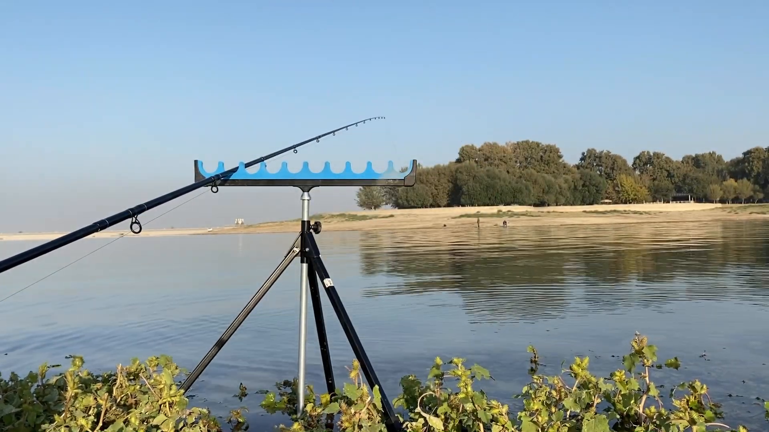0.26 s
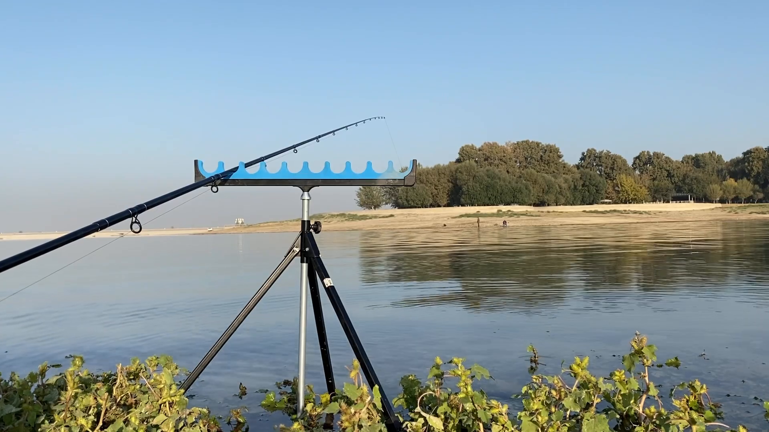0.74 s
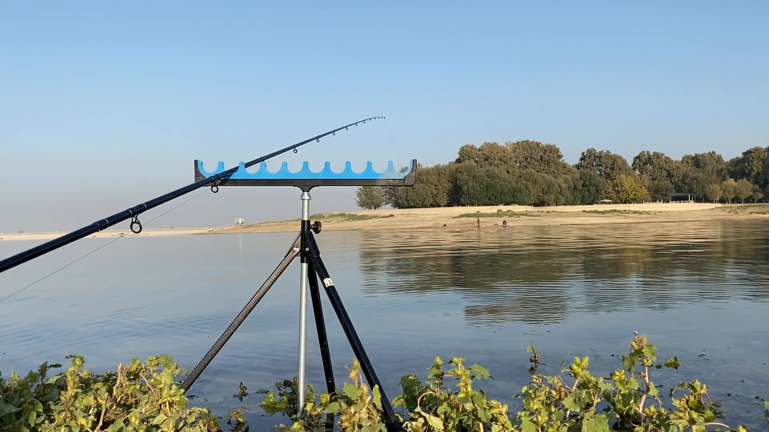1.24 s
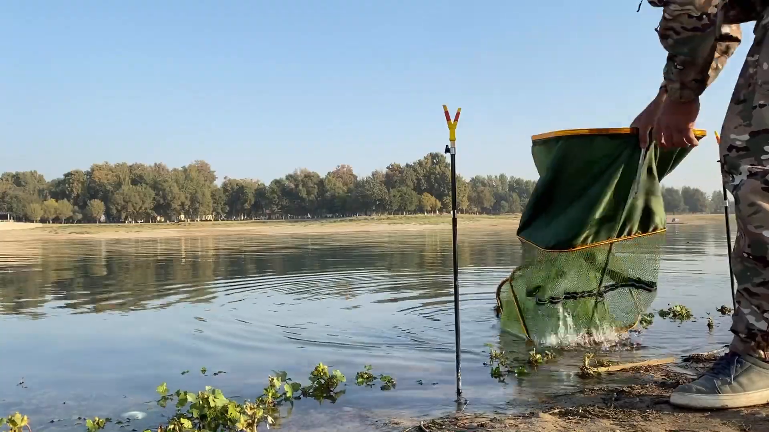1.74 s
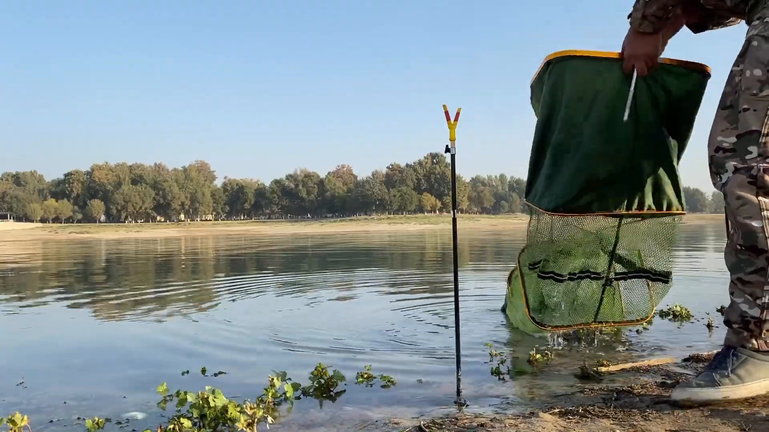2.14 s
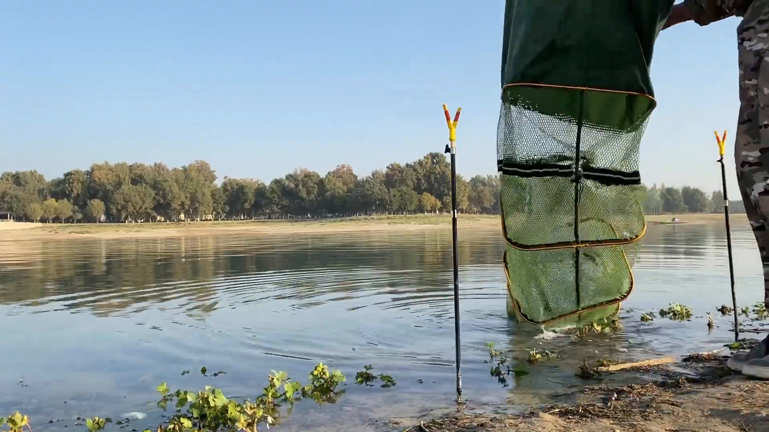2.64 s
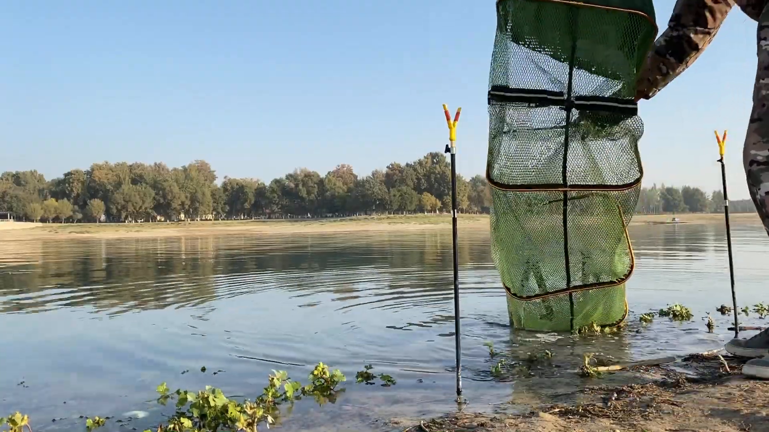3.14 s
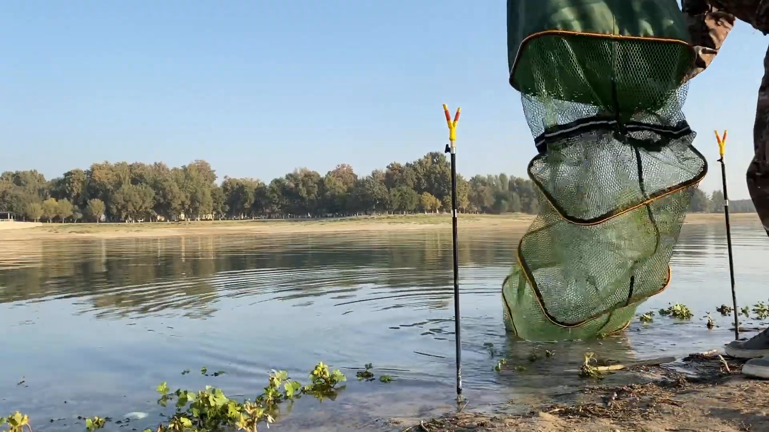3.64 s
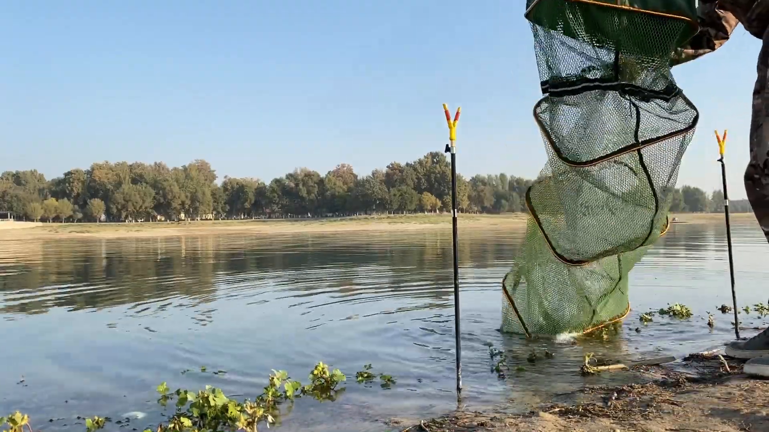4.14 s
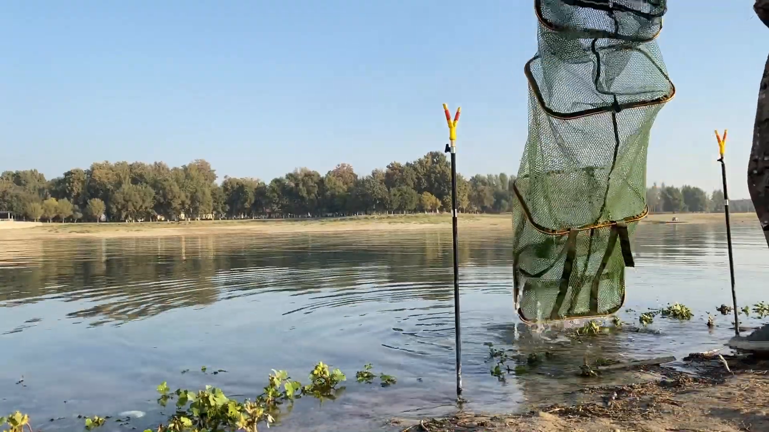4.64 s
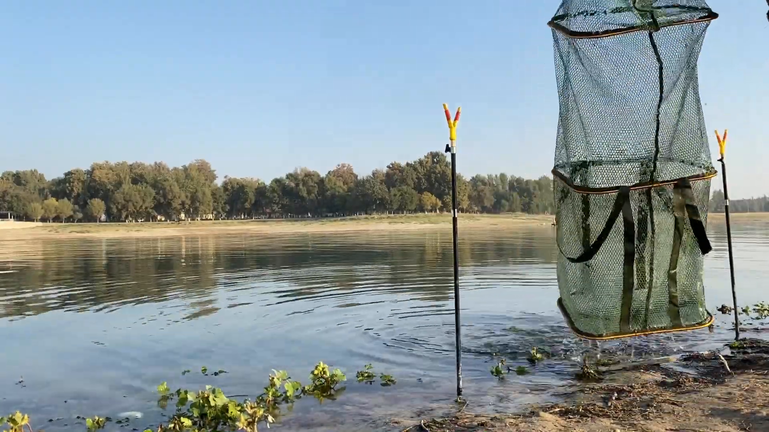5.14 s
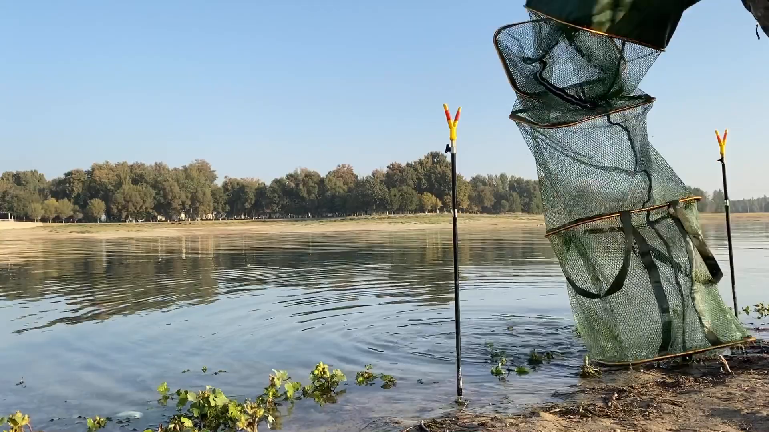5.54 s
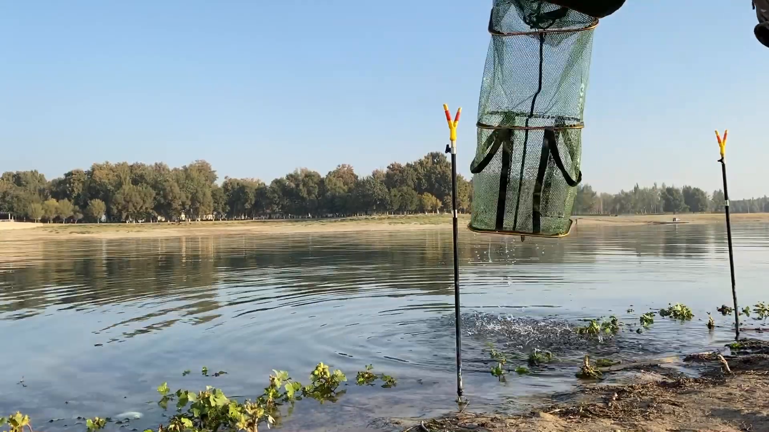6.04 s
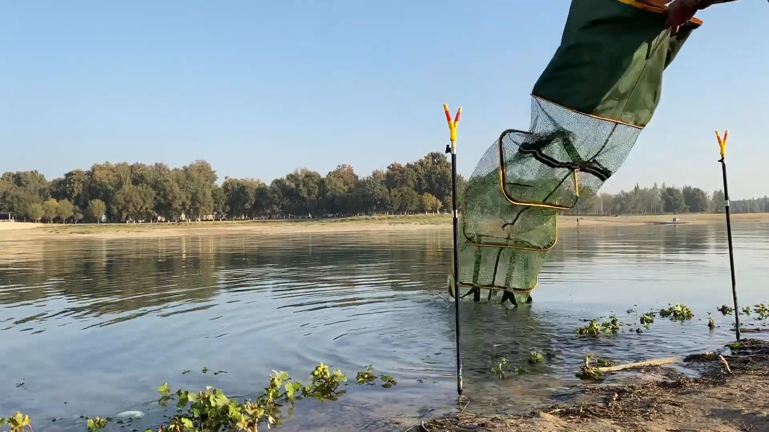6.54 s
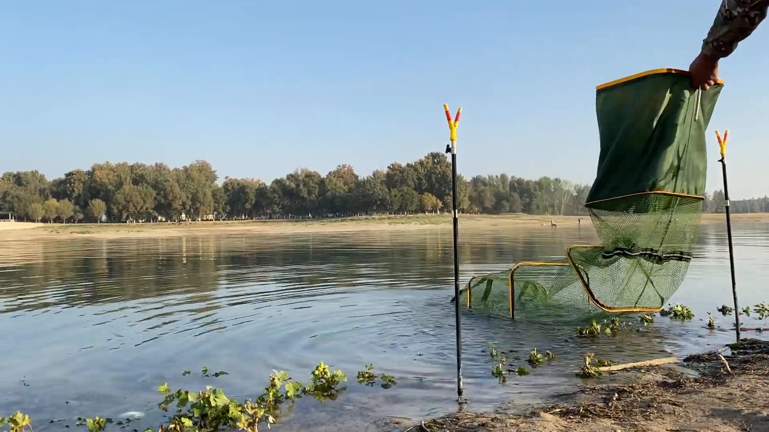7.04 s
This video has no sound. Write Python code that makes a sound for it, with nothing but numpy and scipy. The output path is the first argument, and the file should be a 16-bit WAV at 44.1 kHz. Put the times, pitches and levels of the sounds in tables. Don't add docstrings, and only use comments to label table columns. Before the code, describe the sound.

Low distant hum by calm water, tiny ratchet clicks, an abrupt change, then a wet net pouring, dripping, and dropping back into the shallows.

```python
import sys
import numpy as np
from scipy import signal
from scipy.fft import rfft, irfft, next_fast_len
from scipy.io import wavfile
from scipy.ndimage import uniform_filter1d

SR = 44100
rng = np.random.default_rng(int(sys.argv[2]) if len(sys.argv) > 2 else 0)


def transcribe(u):
    v = np.clip(np.atleast_2d(u).T, -1, 1)
    q = np.round(v * 32767).astype(np.int16)
    wavfile.write(sys.argv[1], SR, q)


def to_linear_factor(level_db):
    exponent = np.asarray(level_db, float) / 20
    return 10 ** exponent


N = 321577


def evened(x):
    return x / np.sqrt(np.mean(x ** 2) + 1e-20)


def read(points, hz):
    f, value = np.transpose(points)
    return np.interp(np.log(hz + 1), np.log(f + 1), value)


def add(mix, s, sound):
    part = mix[round(s * SR):][:len(sound)]
    part += sound[:len(part)]


def coloured(x, points):
    size = next_fast_len(x.shape[-1])
    gain = to_linear_factor(read(points, np.fft.rfftfreq(size, 1 / SR)))
    return irfft(rfft(x, size) * gain, size)[..., :x.shape[-1]]


def band(x, hz, width_hz):
    q = max(hz / width_hz, 0.4)
    return signal.lfilter(*signal.iirpeak(np.clip(hz, 50, 16000), q, SR), x)


def band_twice(x, hz, width_hz):
    return band(band(x, hz, width_hz), hz, width_hz)


def decay(count, t60_s):
    return to_linear_factor(-60 * np.arange(count) / SR / t60_s)


def tick(puff, hz, width_hz, t60_s):
    burst = band_twice(puff * decay(len(puff), t60_s), hz, width_hz)
    return burst / abs(burst).max()


def drops(per_s, spread_db):
    size = to_linear_factor(spread_db * np.minimum(rng.exponential(1, N), 3.4))
    return size * rng.choice([-1., 1.], N) * (rng.random(N) < per_s / SR)


def bubble(hz, t60_s, rise):
    t = np.arange(round(t60_s * SR) + 64) / SR
    ring = np.sin(2 * np.pi * hz * (t + rise * t ** 2 / t60_s))
    return to_linear_factor(-60 * t / t60_s) * (1 - np.exp(-t * hz)) * ring


RISE_SHARE = 0.77


def surges(rows, stretch=1, rise=RISE_SHARE):
    t = np.arange(0, N + 64, 64) / SR
    s, db, fall_s = np.transpose(rows)[:, :, None]
    past = (t - s) / fall_s
    power = to_linear_factor(db - 10 * np.maximum(past / stretch, -past / rise)) ** 2
    return np.interp(np.arange(N) / SR, t, np.sqrt(power.sum(0)))


# [f/Hz, phase/rad]
PORT_PHASE = [(0, -.3), (2070, -.3), (3450, .2), (4800, -.1), (6200, -1.5), (6900, -1.3), (8270, -3.2),
              (11000, -6.4), (11700, -6.9), (13100, -9.1), (14500, -10.3), (15200, -12), (15900, -12.5)]
# [f/Hz, likeness/1]
NEAR_SAME = [(300, 0.98), (1000, 0.89), (2500, 0.9), (4500, 0.33), (8000, 0.78), (13000, 0.87)]


def ports(x, lean, same):
    size = next_fast_len(N)
    hz = np.fft.rfftfreq(size, 1 / SR)
    scatter = rng.standard_normal(1500) * to_linear_factor(-60 * np.arange(1500) / 1500)
    like, mid = np.clip(read(same, hz), 0, 1), rfft(x, size)
    direct = mid * np.sqrt((1 + like) / 2)
    echo = mid * np.sqrt((1 - like) / 2) * rfft(scatter / np.linalg.norm(scatter), size)
    turn = np.interp(hz, *np.transpose(PORT_PHASE)) * hz ** 2 / (hz ** 2 + 300 ** 2)
    offset = to_linear_factor(read(lean, hz) / 2) * np.exp(.5j * turn)
    return irfft([(direct + echo) * offset, (direct - echo) / offset], size)[:, :N]


# [f/Hz, density/dB per Hz]
AIR_1 = [(15, -76), (25, -65.5), (57, -10), (81, -3.5), (176, -29.5), (246, -28), (404, -33), (510, -31),
         (815, -36.5), (1480, -50), (1730, -53), (10400, -73.5), (12500, -90), (16200, -116), (22000, -120)]
# [f/Hz, likeness/1]
SAME_1 = [(60, 0.93), (130, 0.92), (290, 0.36), (640, -0.42), (1410, -0.73), (3100, 0.0083), (6820, -0.28),
          (15000, 1)]
# [f/Hz, level/dB]
LEAN_1 = [(60, -1.7), (240, -1), (950, -0.54), (3770, 2.2), (15000, -2)]
# [f/Hz, density/dB per Hz]
AIR_2 = [(15, -52.5), (25, -23.5), (40, -33.5), (64, 4), (102, -2.5), (129, -8.5), (328, -9.5),
         (485, -16.5), (581, -13.5), (1690, -33), (8250, -64), (10400, -54), (12500, -63), (16200, -80),
         (22000, -120)]
# [f/Hz, likeness/1]
SAME_2 = [(60, 0.98), (130, 0.91), (290, 0.9), (640, 0.4), (1410, 0.46), (3100, 0.28), (6820, 0.6),
          (15000, 0.96)]
# [f/Hz, level/dB]
LEAN_2 = [(60, -1.5), (240, -2.2), (950, -1.1), (3770, 2), (15000, 2)]
# [t/s, level/dB]
SWELL = [(0, -8), (.45, -6), (.95, 0), (1.25, -4.5), (2, 1.5), (3.05, 1.5), (3.6, -2), (4.3, .5),
         (7.29, .5)]


def air(spectrum, rms_db, same, lean, patchy_db):
    frames, hz = N // 512 + 5, np.fft.rfftfreq(2048, 1 / SR)
    a, b, c, d, patches = rng.standard_normal((frames, 1025, 5)).T
    patches = evened(uniform_filter1d(uniform_filter1d(patches, 20, 0), 8, 1))
    like = np.clip(read(same, hz), -1, 1)[:, None]
    left, other = a + 1j * b, c + 1j * d
    turn = np.interp(hz, *np.transpose(PORT_PHASE)) * (hz > 300)
    tilt = (to_linear_factor(read(lean, hz) / 2) * np.exp(.5j * turn))[:, None]
    z = np.array([left * tilt, (like * left + np.sqrt(1 - like ** 2) * other) / tilt])
    swell_db = np.interp(np.arange(frames) * 512 / SR, *np.transpose(SWELL)) * (hz < 160)[:, None]
    z *= to_linear_factor(read(spectrum, hz)[:, None] + patchy_db * patches + swell_db)
    return to_linear_factor(rms_db) * evened(signal.istft(z, nperseg=2048, noverlap=1536)[1][:, :N])


# [t/s, level/dB, f/Hz, width/Hz, t60/s]
ARRIVALS = [(2.3499, -21, 7800, 5000, 0.018), (2.3498, -27, 15000, 2500, .015),
            (2.3503, -9, 2160, 2000, 0.0069), (2.3513, -27, 6000, 1700, 0.013),
            (2.3508, -17, 1330, 690, 0.016), (2.3537, -32.5, 6800, 9800, 0.031),
            (2.353, -33.5, 2000, 1400, 0.04), (2.402, -44.5, 3850, 1500, 0.1),
            (2.403, -31.5, 710, 910, 0.091), (2.419, -36.5, 1320, 950, 0.14), (2.2, -42, 3980, 5960, 0.025),
            (2.437, -42, 630, 1250, 0.22), (2.442, -51, 7400, 7000, 0.15), (2.418, -24.5, 527, 250, 0.053),
            (2.426, -28, 350, 210, 0.14), (2.44, -32, 190, 330, 0.14), (2.47, -39, 135, 124, 0.47)]
# [t/s, level/dB]
BOOM = [
    (2.445, -46),
    (2.46, -35.5),
    (2.47, -25),
    (2.484, -29),
    (2.5, -31),
    (2.52, -43.5),
    (2.57, -42.5),
    (2.622, -53),
]
BOOM_HZ, BOOM_SAG_HZ_PER_S = 64.5, 46
# [f/Hz, level/dB]
SHOT_LEAN = [(60, -2), (300, -4.5), (700, -9.5), (1400, -4), (3100, 2.7), (15000, -1)]
# [f/Hz, likeness/1]
SHOT_SAME = [(200, 1), (1000, 0.72), (5000, 0.86)]


def shot():
    out = np.zeros(N)
    t = np.arange(12000) / SR
    for s, db, hz, width_hz, t60_s in ARRIVALS:
        noise = rng.standard_normal(len(t))
        rise = np.minimum(t * min(hz, 3000), 1)
        add(out, s, to_linear_factor(db - 60 * t / t60_s) * rise * evened(band_twice(noise, hz, width_hz)))
    s, db = np.transpose(BOOM)
    t = np.arange(s[0], s[-1], 1 / SR)
    angle = 2 * np.pi * np.cumsum(BOOM_HZ - BOOM_SAG_HZ_PER_S * (t - s[0])) / SR
    wave = np.cos(angle) - 0.29 * np.cos(2 * angle)
    add(out, s[0], np.sqrt(2) * to_linear_factor(np.interp(t, s, db)) * wave)
    return ports(out, SHOT_LEAN, SHOT_SAME)


# [t/s, peak/dB]
CLICKS = [
    (0.2301, -28.5),
    (0.2498, -34.5),
    (0.276, -32.5),
    (0.3065, -31.5),
]
# [f/Hz, level/dB, t60/s]
PAWL = [(2000, -26, 0.022), (2340, 2.5, 0.036), (2590, 0, 0.029), (3070, 0, 0.045), (3530, -8, 0.19),
        (5000, -6, .03), (5040, -12, .03), (5240, 4.5, 0.049), (5310, 3, 0.045), (5930, -2, 0.044),
        (7420, 15.5, 0.016), (9570, -2, 0.045), (10500, -8, 0.033), (11200, 2, 0.024)]
# [peak t/s, level/dB, 10 dB fall/s]; negative = that time for the rise, a quicker fall
STIR = [
    (0.17, -74.5, 0.2),
    (0.41, -67.5, -0.05),
    (0.74, -76.5, 1.2),
    (0.97, -68, 0.13),
]
# [t/s, peak/dB]
FLICKS = [
    (.328, -50),
    (.357, -53),
    (0.365, -52),
    (.378, -49),
    (.431, -53),
]
# [f/Hz, level/dB]
REEL_LEAN = [(60, 6), (380, -12), (2380, 5), (15000, 2)]


def reel():
    out, t = np.zeros(N), np.arange(4000) / SR
    ring = sum(to_linear_factor(db - 60 * t / t60_s) * np.sin(2 * np.pi * hz * t) for hz, db, t60_s in PAWL)
    for s, db in CLICKS:
        chatter = rng.standard_normal(len(t))
        strikes = 0.03 * chatter * to_linear_factor(-60 * t / 0.03)
        strikes[0] += 1
        strikes[42] += 0.3
        click = signal.fftconvolve(ring, strikes)[:len(t)]
        click = click / abs(click).max() + 0.15 * tick(chatter[::-1], 5600, 10000, 0.081)
        add(out, s, to_linear_factor(db) * click)
    for s, db in FLICKS:
        add(out, s, to_linear_factor(db) * tick(rng.standard_normal(600), 8500, 7000, 0.007))
    out = signal.sosfilt(signal.butter(4, 1700, "high", fs=SR, output="sos"), out)
    knock = tick(rng.standard_normal(600), 1000, 600, 0.024)
    add(out, 0.319, to_linear_factor(-54.5) * knock)
    rustle = evened(band(drops(4300, 4.6), 7500, 4400))
    return ports(out + to_linear_factor(-2.5) * surges(STIR) * rustle, REEL_LEAN, NEAR_SAME)


# [t/s, peak/dB, lowest f/Hz]
SNAPS = [
    (3.065, -41, 5000),
    (3.33, -47, 5000),
    (3.61, -52, 6050),
    (4.485, -44, 1200),
    (5.985, -36, 800),
    (6.1555, -41, 1500),
    (6.5268, -21, 280),
]
# [peak t/s, level/dB, 10 dB fall/s]
RUB = [
    (5.47, -55, 0.01),
    (5.515, -60, 0.02),
]


def snapping():
    out = surges(RUB) * evened(band_twice(drops(9000, 2.2), 6600, 3600))
    for s, db, hz in SNAPS:
        puff = rng.standard_normal(400)
        puff[0] += 5
        edges = signal.butter(1, [hz, min(14 * hz, 16000)], "band", fs=SR)
        snap = signal.lfilter(*edges, puff * decay(400, 0.0045))
        add(out, s, to_linear_factor(db) * snap / abs(snap).max())
    return out


# [t/s, level/dB, from f/Hz, to f/Hz, length/s]
GLIDES = [(2.091, -51.5, 1165, 1710, 0.05), (4.515, -49, 910, 1310, 0.026), (4.702, -53, 990, 1500, 0.027),
          (4.893, -46, 1610, 2230, 0.012), (4.934, -51, 1140, 1700, .016), (4.946, -53, 2770, 3400, 0.029),
          (5.945, -48.5, 1100, 1500, 0.021), (5.987, -52, 2210, 3000, 0.019),
          (6.028, -49.5, 994, 1850, 0.026), (6.638, -41, 332, 149, 0.022), (6.707, -43, 473, 600, 0.019),
          (6.76, -45, 400, 520, 0.031), (5.961, -51, 2000, 3300, 0.012), (4.649, -44.5, 1300, 1450, 0.01)]
# [t/s, level/dB, from f/Hz, to f/Hz, length/s]
CHIRPS = [(1.783, -49, 2580.0, 2540.0, 0.009), (1.81, -44, 2000, 2070.0, 0.01),
          (1.825, -45.0, 1480, 1770.0, 0.012), (1.999, -47, 2560, 4960, 0.0074),
          (2.038, -47.5, 2200.0, 2370.0, 0.012), (2.1, -49, 1260, 1380.0, 0.011),
          (2.117, -47.5, 1470, 1550.0, 0.014), (5.943, -52, 2000, 2800, 0.012),
          (2.174, -52.0, 2850, 2890.0, 0.01), (2.187, -58, 3200, 5000, 0.0072),
          (3.043, -56, 1300, 1600, 0.018), (4.212, -49, 1976, 1880, 0.019),
          (4.393, -50, 1720.0, 1980.0, 0.01), (4.593, -53, 3000, 4600, 0.008),
          (4.704, -48.0, 1420.0, 1590.0, 0.026), (4.838, -54, 2000, 4500, 0.0074),
          (6.852, -47, 636, 716, 0.022), (5.085, -54, 2410.0, 2800.0, 0.013),
          (5.633, -48.0, 2710.0, 2630.0, 0.0093), (5.644, -44.5, 820.0, 900.0, 0.011),
          (5.649, -46, 1610, 1870, 0.025), (5.8, -49, 2130, 2930.0, 0.01), (5.849, -53, 990, 1160.0, 0.012),
          (5.876, -50, 2370.0, 2410.0, 0.009), (5.965, -54, 2800, 4800, 0.014),
          (5.991, -51.0, 2350, 2650, 0.015), (6.074, -52, 1770.0, 1980.0, 0.012),
          (6.379, -57.5, 2500, 2000, 0.02), (6.535, -43, 1770.0, 2200.0, 0.012),
          (6.757, -39, 1250.0, 1550.0, 0.0078), (6.777, -44, 1160.0, 1420.0, 0.016),
          (6.795, -48, 1420.0, 2070.0, 0.0084)]
CHIRP_DB = -1.5


def glides():
    out = np.zeros(N)
    chirps = [(s, db + CHIRP_DB, *rest) for s, db, *rest in CHIRPS]
    for s, db, from_hz, to_hz, length_s in list(GLIDES) + chirps:
        u = np.arange(0, 1, 1 / (length_s * SR))
        turns = np.cumsum(from_hz + (to_hz - from_hz) * u ** 1.53) / SR
        fade = to_linear_factor(db + 4.0 - 12.3 * u) * signal.windows.tukey(len(u), 0.4)
        add(out, s, fade * np.sin(2 * np.pi * turns))
    return out


# [t/s, peak/dB, bubble f/Hz]
DRIPS = [(1.668, -30.5, 1760), (1.851, -36, 2380), (1.948, -39.5, 2340), (1.972, -40, 1500),
         (2.0, -35, 3800), (2.157, -42, 2190), (2.587, -46.5, 2380), (2.596, -45, 1370), (2.752, -56, 5700),
         (2.968, -54, 4480), (3.129, -57, 3150), (3.39, -52.5, 3750), (3.452, -55, 3320),
         (3.602, -48.5, 2770), (3.968, -54.5, 3250)]
# [t/s, peak/dB, bubble f/Hz]
DRIPS_LATE = [(4.405, -43.5, 2080), (4.441, -42.5, 1290), (4.46, -41.5, 1480), (4.492, -34.5, 2820),
              (4.592, -39.5, 2260), (4.641, -38, 3080), (4.671, -38, 2030), (4.737, -36.5, 1830),
              (4.801, -41, 1750), (4.848, -29.5, 2830), (5.012, -44.5, 2230), (5.135, -39.5, 3770),
              (5.155, -34.5, 3170), (5.207, -44, 2000), (5.244, -42.5, 3900), (5.619, -41, 2200),
              (5.635, -35.5, 1490), (5.651, -33, 1920), (5.773, -43, 1530), (5.788, -41.5, 2930),
              (6.052, -45.5, 3500), (6.11, -48, 2600), (6.168, -46, 2170), (6.2, -48.5, 2750),
              (6.068, -47.5, 2300), (6.447, -41, 1180), (6.592, -27, 1300), (6.671, -36, 1150),
              (6.712, -42, 2140)]
# [t/s, peak/dB, bubble f/Hz]
SLAPS = [(1.767, -48, 1760), (1.813, -51, 3230), (1.925, -37, 1900), (2.52, -46.5, 1330),
         (2.7883, -45, 960), (2.903, -42.5, 1220), (4.213, -44, 1975), (4.844, -39, 1230),
         (4.937, -41, 2250), (5.375, -43, 880), (5.915, -38, 2480), (6.52, -30.5, 1940), (6.569, -37, 1020),
         (6.606, -24.5, 3030), (6.786, -33.5, 3020), (6.846, -38, 2280), (7.175, -48.5, 840)]
# [t/s, peak/dB, bubble f/Hz]
BLIPS = [(1.655, -49, 2200.0), (1.666, -47, 2730), (1.812, -48, 1310), (1.812, -45, 3500),
         (1.993, -51, 2350), (2.011, -51.5, 1160.0), (2.156, -47.5, 1720.0), (2.181, -52, 2240.0),
         (2.914, -56, 4100), (3.034, -53.5, 1600), (4.221, -54, 2540.0), (4.221, -52, 3530.0),
         (4.348, -52, 2150.0), (4.64, -53, 3830.0), (4.67, -51.0, 1210.0), (4.746, -52, 2540.0),
         (4.79, -54, 3830.0), (4.8, -49, 1220), (4.823, -49, 2110.0), (4.846, -41, 1940.0),
         (4.858, -49, 4910.0), (4.87, -49, 4000), (4.936, -51, 4480.0), (4.937, -55, 2330.0),
         (4.948, -52.0, 2890.0), (5.326, -52, 2780), (5.649, -42, 2750), (5.964, -51.0, 2600),
         (5.984, -52.0, 1530), (5.921, -42.5, 2600), (5.91, -49, 2300), (6.446, -52, 1890.0),
         (6.525, -43, 5680.0), (6.525, -44, 2820), (6.569, -46, 2240.0), (6.575, -46, 3400.0),
         (6.589, -47, 6680.0), (6.695, -50, 4010.0), (6.732, -42.5, 2020.0), (6.775, -45, 3040),
         (6.791, -48, 3660.0), (6.845, -46, 2070.0), (6.897, -50, 1240)]
# [t/s, peak/dB, centre f/Hz]
TICKS = [(3.064, -41, 4500), (3.187, -45.5, 4200), (3.2147, -35, 5930), (3.259, -42.5, 4000),
         (3.2983, -42, 5030), (3.61, -45.5, 6100), (4.546, -46, 10300), (4.673, -44, 3500),
         (4.7388, -38, 4870), (4.8795, -37, 4660), (4.915, -36, 4540), (5.0435, -40, 6450),
         (5.079, -43, 10100), (5.2567, -41, 7950), (5.941, -34.5, 5040), (5.9696, -35, 3600),
         (6.156, -33, 4640), (6.2144, -45, 7640), (6.3232, -43.5, 10500), (6.5727, -27, 6670),
         (6.692, -32, 5180)]
# [t/s, peak/dB, centre f/Hz]
PRICKS = [(2.5197, -42.5, 6360), (2.5686, -55, 9890), (2.821, -52, 6700), (2.9602, -52, 6890),
          (3.042, -54, 10900), (3.2879, -58, 6410), (3.5588, -53, 6890), (3.7284, -55, 11300),
          (3.8921, -50, 6650), (3.9185, -58, 7660), (3.935, -55, 7210), (4.1061, -51, 11000),
          (4.3061, -49, 6670), (4.338, -46, 7180), (4.5575, -40.5, 9800), (4.6159, -41, 10500),
          (4.6945, -38, 10900), (4.778, -43, 10800), (4.945, -39, 10400), (5.003, -45, 10600),
          (5.2884, -46, 10400), (5.4086, -49, 10300), (5.4477, -40, 7100), (5.5887, -44, 10800),
          (5.8217, -48, 11100), (5.8913, -36.5, 6190), (6.0187, -40, 7520), (6.1828, -58, 6020),
          (6.2881, -53, 12000), (6.3849, -51, 9890), (6.4378, -43, 9940), (6.5081, -38, 10700),
          (6.8334, -44, 6510), (7.1477, -50, 10600)]
DRIP_RING_DB, DRIP_SPLAT_DB, SLAP_RING_DB = -3.5, -7, -7.5
BLIP_RING_DB, BLIP_SPLAT_DB, PRICK_DB = 2.5, 1, 2


def dripping():
    out = np.zeros(N)
    drips = list(DRIPS) + list(DRIPS_LATE)
    for rows, ring_db, splat_db in ((drips, DRIP_RING_DB, DRIP_SPLAT_DB), (SLAPS, SLAP_RING_DB, 0)):
        for s, db, hz in rows:
            ring = bubble(0.92 * hz, 0.015 + 16 / hz, 0.235)
            splat = tick(rng.standard_normal(900), hz, 500 + 0.98 * hz, 0.031)
            add(out, s, to_linear_factor(db + ring_db) * ring / abs(ring).max())
            add(out, s, to_linear_factor(db + splat_db) * splat)
    for s, db, hz in BLIPS:
        ring = bubble(0.95 * hz, 0.016 + 12 / hz, 0.21)
        splat = tick(rng.standard_normal(500), hz, 1500, 0.015)
        add(out, s, to_linear_factor(db + BLIP_RING_DB) * ring / abs(ring).max())
        add(out, s, to_linear_factor(db + BLIP_SPLAT_DB) * splat)
    for s, db, hz in TICKS:
        add(out, s, to_linear_factor(db) * tick(rng.standard_normal(600), hz, 2030, 0.01))
    for s, db, hz in PRICKS:
        add(out, s, to_linear_factor(db + PRICK_DB) * tick(rng.standard_normal(400), hz, 7700, 0.0058))
    return out


BEADS, BEAD_DB, BEAD_SPREAD_DB = 380, 10, 3.5
BEADS_FROM_S, BEAD_TOP_DB = 2.4, -66


def beads(spraying):
    out = np.zeros(N)
    for when, pitch, life, climb, size in rng.random((BEADS, 5)):
        s = BEADS_FROM_S + when * (N / SR - BEADS_FROM_S)
        hz = 2300 * 3.4 ** pitch
        size_db = BEAD_DB - BEAD_SPREAD_DB * np.log(size + 0.055)
        gain = min(spraying[int(s * SR)], to_linear_factor(BEAD_TOP_DB)) * to_linear_factor(size_db)
        add(out, s, gain * bubble(hz, (14 + 60 * life) / hz, 1.6 * climb ** 2))
    return out


# [peak t/s, bubbling/dB, spray/dB, 10 dB fall/s]
GUSHES = [(1.6, -71, -61.5, 0.16), (1.678, -44, -58, 0), (1.76, -52.5, -68, 0.17), (1.82, -51, -78, -0.02),
          (1.86, -54, -68, 0.14), (1.99, -54, -60.5, 0.18), (2.15, -52.5, -57, 0.1453),
          (2.23, -57, -60, 0.0249), (2.33, -57, -84, 0.06), (2.65, -64, -73, 0.13), (3, -64.5, -77, 0.2),
          (3.3, -64, -73, 0.13), (3.6, -74.5, -88.5, 0), (4.17, -63, -69, 0.16), (4.28, -61, -82, 0.1),
          (4.47, -52.5, -64.5, 0.12), (4.65, -54.5, -61.5, 0.14), (4.74, -48, -62, 0.1127),
          (4.86, -60, -64, 0.06), (4.95, -61.5, -64, 0.13), (5.09, -59, -62.5, 0.13),
          (5.19, -64, -66, -0.06), (5.49, -57.5, -59, 0.08), (5.645, -42, -57, 0.0153),
          (5.81, -56, -62.5, 0.13), (5.93, -55, -61.5, 0.1), (6.03, -80, -61, 0.44),
          (6.445, -60, -65, 0.02), (6.53, -48, -51, 0.0444), (6.575, -44, -46, 0.0364),
          (6.61, -42.5, -45.5, 0.05), (6.7, -41, -48, 0.0469), (6.777, -43, -68, 0.05),
          (6.93, -59.5, -67, .07), (7.1, -86, -78.5, 1.5)]
# [t/s, bubbling/dB, spray/dB, 10 dB fall/s]
SHEETS = [
    (1.652, -56, -62, .04),
    (5.291, -58.5, -63.5, 0.13),
    (6.504, -55, -54.5, 0.12),
]
SHEET_RISE_SHARE = 0.06


def flow(column, stretch, least_db):
    gushes, sheets = (np.array(rows)[:, [0, column, -1]] for rows in (GUSHES, SHEETS))
    gush, sheet = surges(gushes, stretch), surges(sheets, stretch, SHEET_RISE_SHARE)
    return np.sqrt(gush ** 2 + sheet ** 2 + to_linear_factor(least_db) ** 2)


# [f/Hz, level/dB]
GURGLE = [(500, -8), (900, -5.5), (1400, -2), (2500, 1), (3700, -4), (5500, -14.5), (8000, -20.5)]
# [f/Hz, level/dB]
SPRAY = [(700, -41), (1500, -21), (3000, -9.5), (5000, -8), (7000, -7), (11000, -7), (13500, -18),
         (16200, -21)]
# [peak t/s, level/dB, 10 dB fall/s]
SLOSH = [
    (6.46, -49.5, 0.08),
    (6.53, -55, 0.09),
    (6.63, -45, 0.13),
    (6.8, -50.5, 0.2),
]
TRICKLE_DB, DRIZZLE_DB = -88, -77
BUBBLING_STRETCH, SPRAY_STRETCH = 0.91, 1.25


def draining():
    bubbling = flow(1, BUBBLING_STRETCH, TRICKLE_DB)
    spraying = flow(2, SPRAY_STRETCH, DRIZZLE_DB)
    swarm = np.zeros(N)
    for hz in np.geomspace(700, 7000, num=48):
        ring = bubble(hz, 30 / hz * rng.uniform(0.41, 1.87), 0.15 + rng.exponential(0.7))
        swarm += signal.oaconvolve(drops(36, 3.4), ring / np.linalg.norm(ring))[:N]
    swarm = evened(swarm) + 0.32 * evened(drops(1300, 2.1))
    wander = evened(uniform_filter1d(uniform_filter1d(rng.standard_normal(N), 300), 300))
    clumps = to_linear_factor(2.56 * np.clip(wander, -3, 1.6))
    mist = evened(drops(2000, 4.7)) + 0.93 * rng.standard_normal(N)
    slosh = evened(band_twice(drops(300, 4.3), 310, 650))
    gurgle = to_linear_factor(-1.0) * bubbling * evened(coloured(np.sqrt(clumps) * swarm, GURGLE))
    gurgle += to_linear_factor(-4.0) * surges(SLOSH) * slosh
    spray = to_linear_factor(2.5) * spraying * evened(coloured(clumps * mist, SPRAY))
    return gurgle + beads(spraying), spray


# [f/Hz, level/dB]
NET_LEAN = [(60, -14), (130, -4), (290, 0.5), (640, -3), (1410, -6.5), (3100, 1.5), (6820, 0), (15000, 0)]


def net():
    layers = (dripping() + glides() + snapping(), *draining())
    return sum(ports(x, NET_LEAN, NEAR_SAME) for x in layers)


CUT_S, CUT_FADE_S = 1.418, 0.0055


def scene():
    second = np.clip((np.arange(N) / SR - CUT_S) / CUT_FADE_S, 0, 1)
    first_air = air(AIR_1, -44, SAME_1, LEAN_1, patchy_db=1.2)
    second_air = air(AIR_2, -49, SAME_2, LEAN_2, patchy_db=1.45)
    return (1 - second) * first_air + second * (second_air + net()) + reel() + shot()


def band_limit(x):
    return signal.sosfilt(signal.butter(12, 16380, fs=SR, output="sos"), x)


# [f/Hz, level/dB]
MIC = [(20, -21), (45, 0), (7900, 1), (9200, 1.5), (12300, 0.5), (15750, -1.5), (15900, -33)]


def record(dry):
    return band_limit(coloured(dry, MIC))


dry = scene()
out = record(dry)
transcribe(out)
```